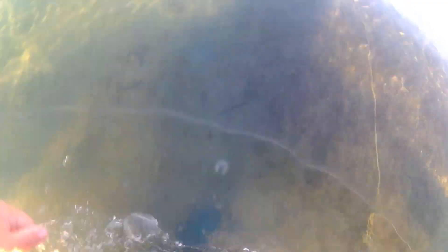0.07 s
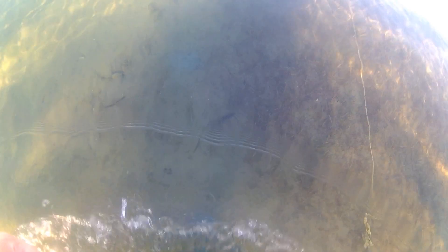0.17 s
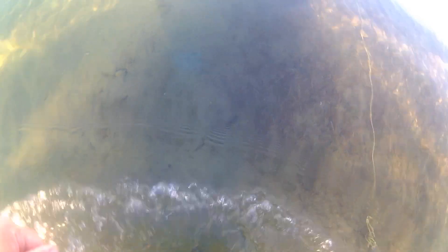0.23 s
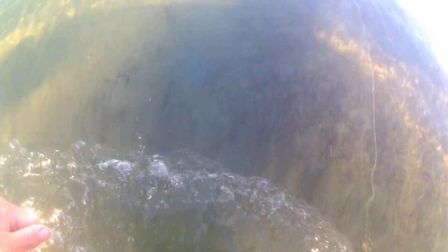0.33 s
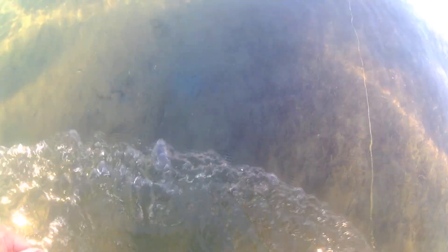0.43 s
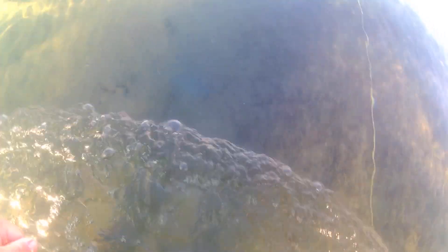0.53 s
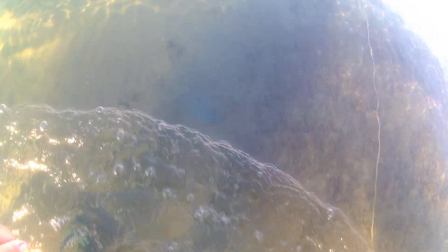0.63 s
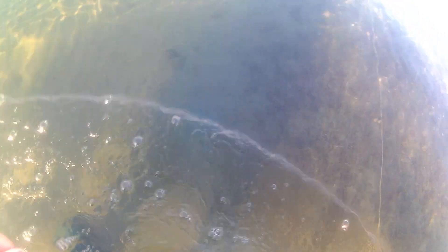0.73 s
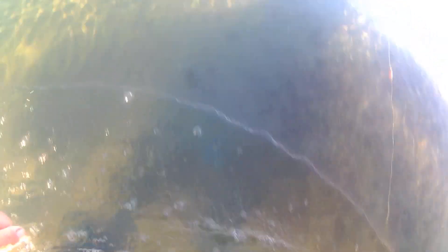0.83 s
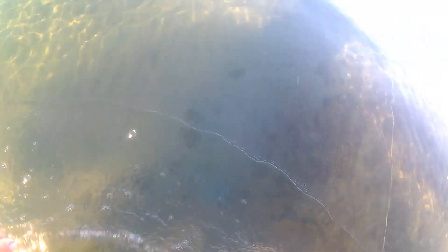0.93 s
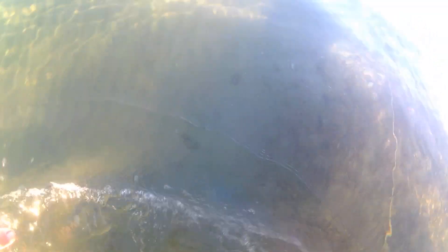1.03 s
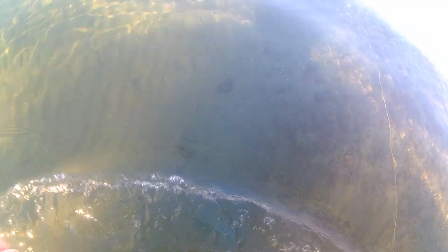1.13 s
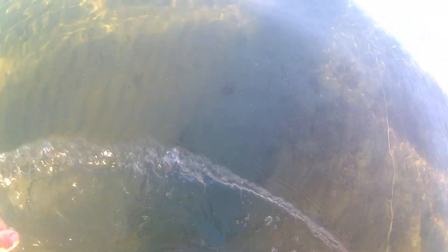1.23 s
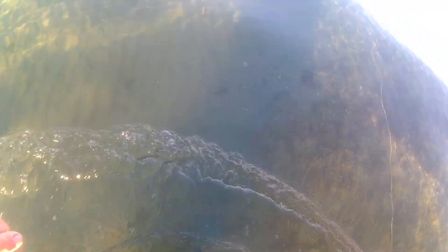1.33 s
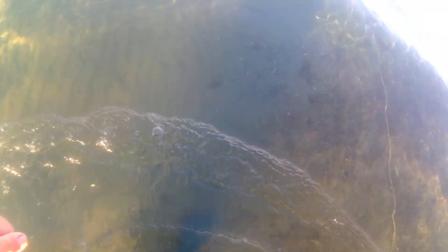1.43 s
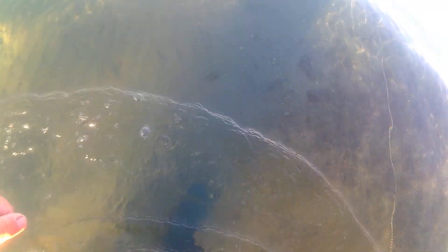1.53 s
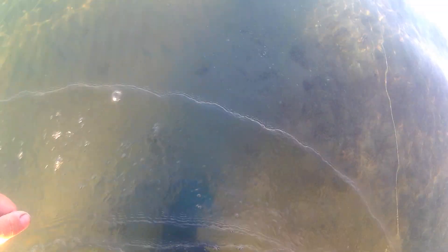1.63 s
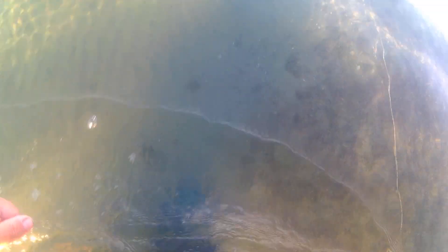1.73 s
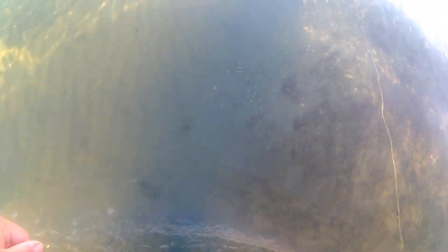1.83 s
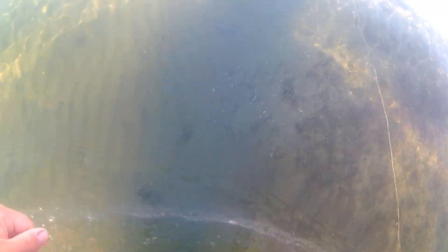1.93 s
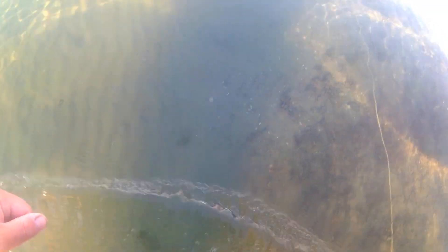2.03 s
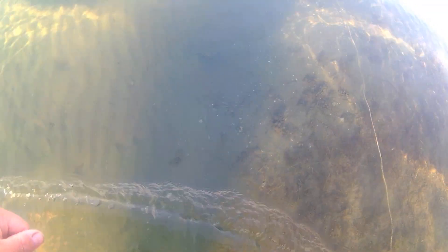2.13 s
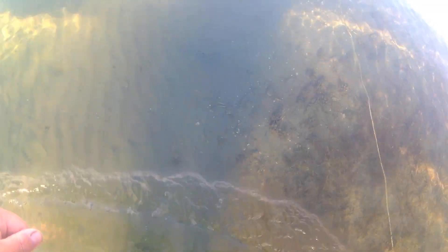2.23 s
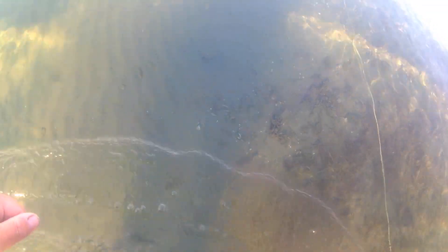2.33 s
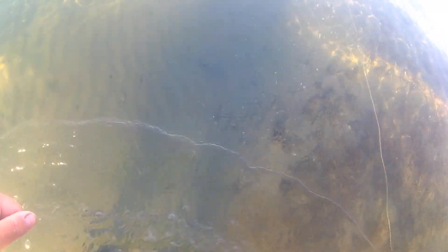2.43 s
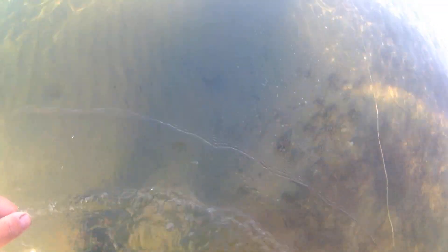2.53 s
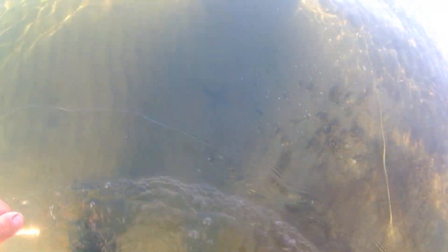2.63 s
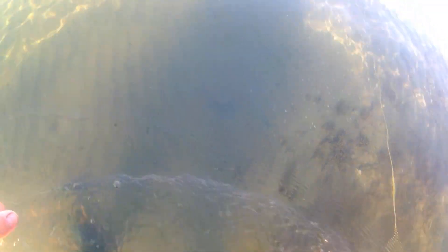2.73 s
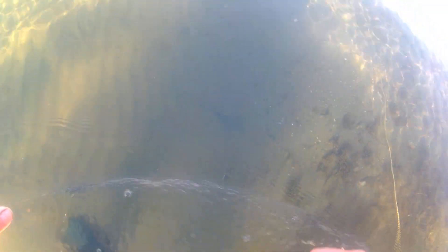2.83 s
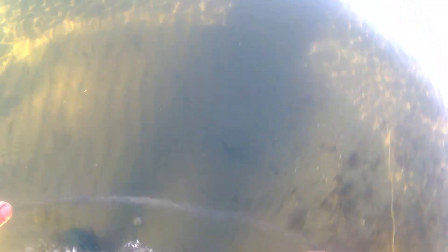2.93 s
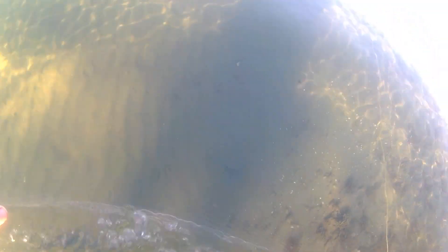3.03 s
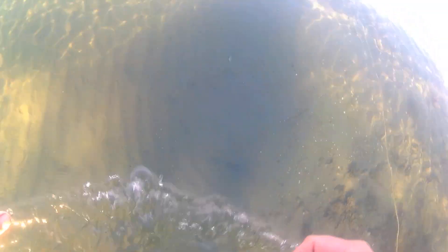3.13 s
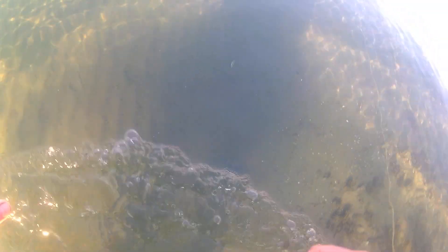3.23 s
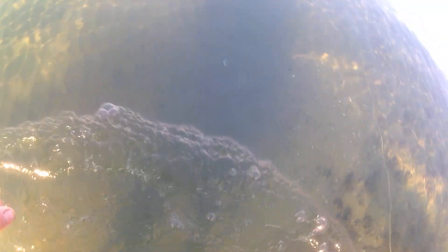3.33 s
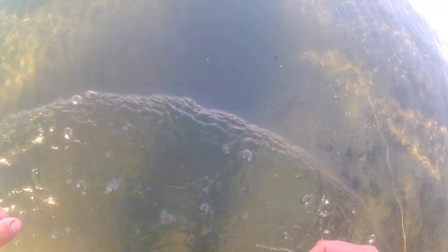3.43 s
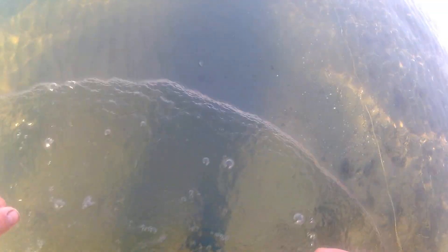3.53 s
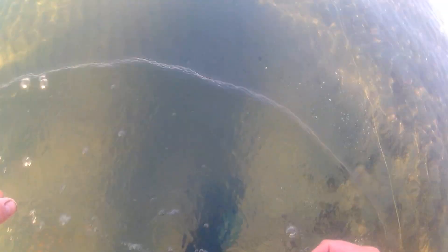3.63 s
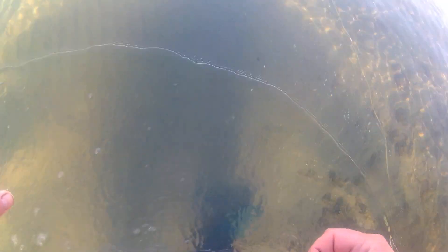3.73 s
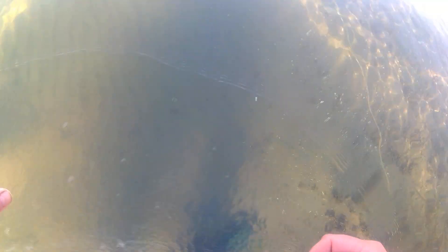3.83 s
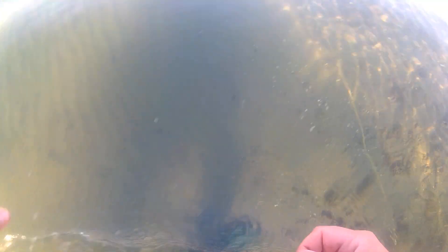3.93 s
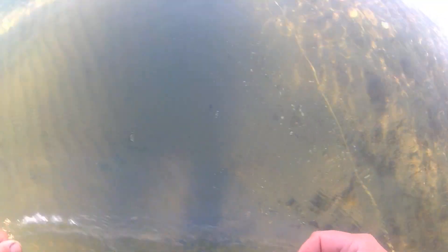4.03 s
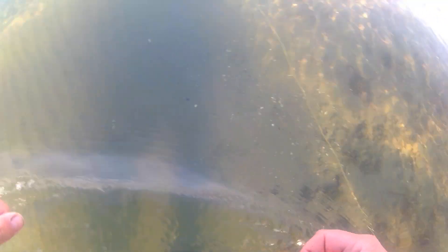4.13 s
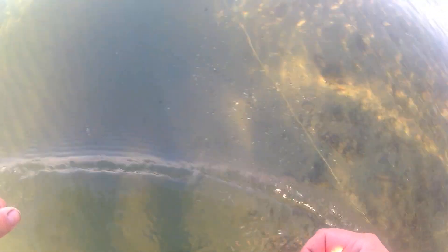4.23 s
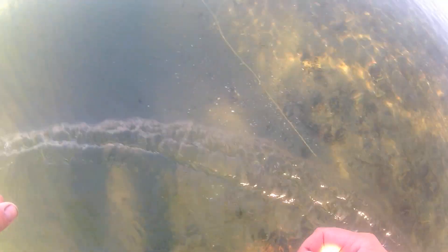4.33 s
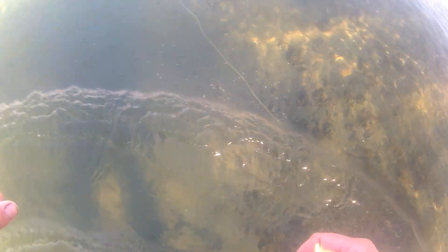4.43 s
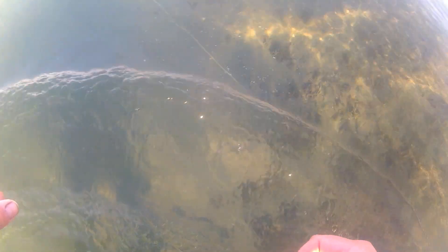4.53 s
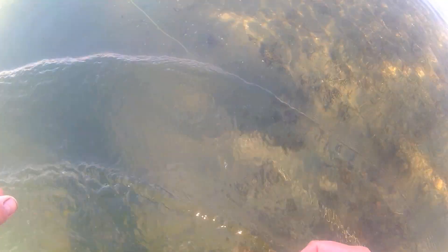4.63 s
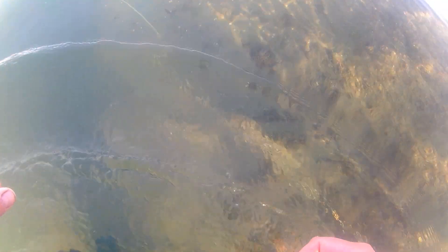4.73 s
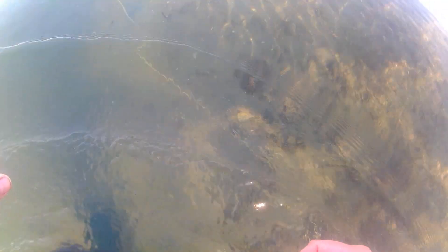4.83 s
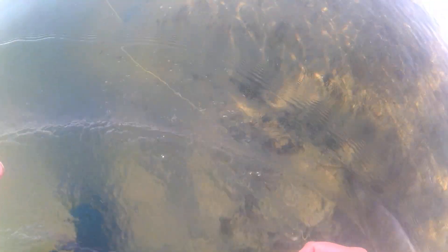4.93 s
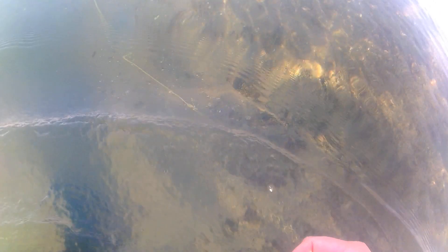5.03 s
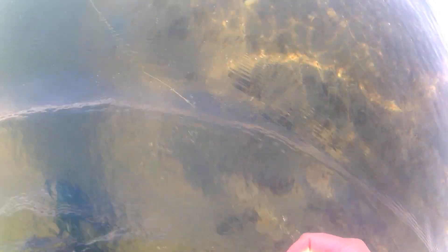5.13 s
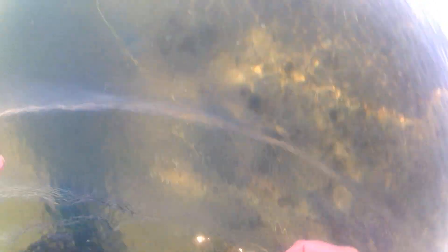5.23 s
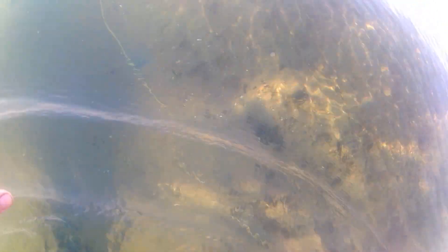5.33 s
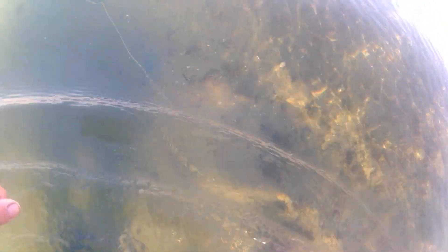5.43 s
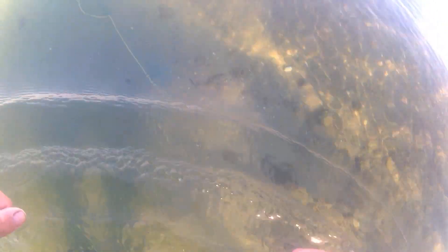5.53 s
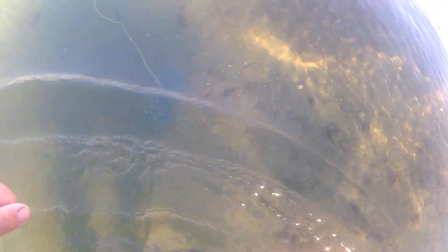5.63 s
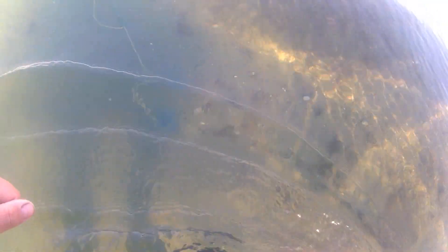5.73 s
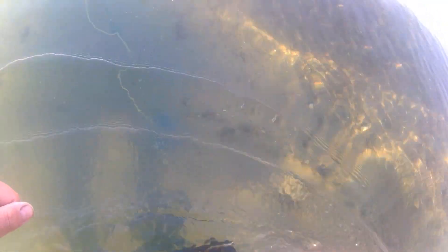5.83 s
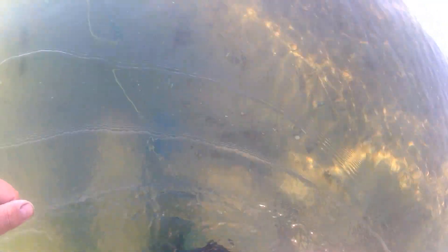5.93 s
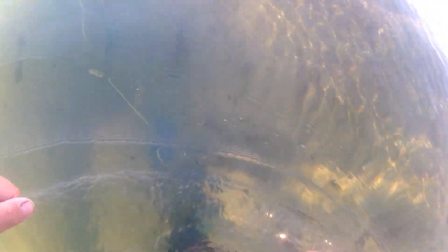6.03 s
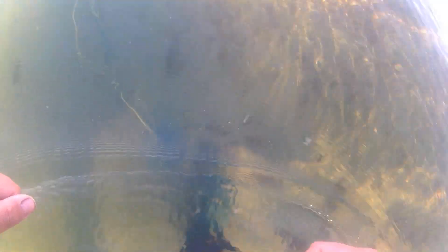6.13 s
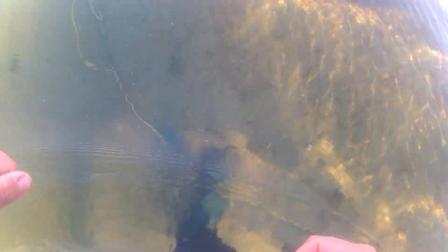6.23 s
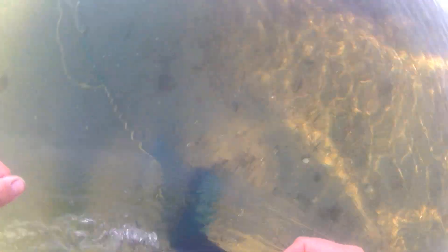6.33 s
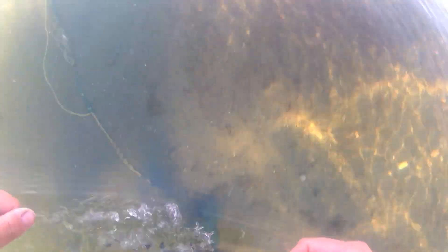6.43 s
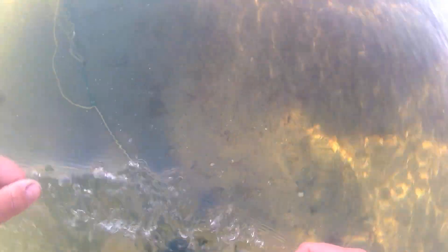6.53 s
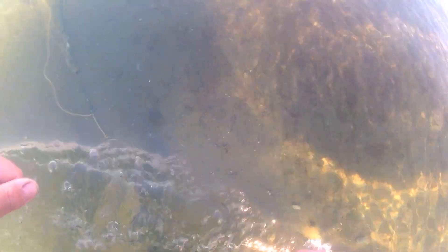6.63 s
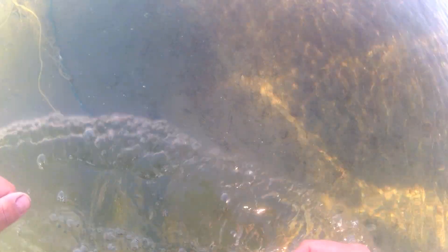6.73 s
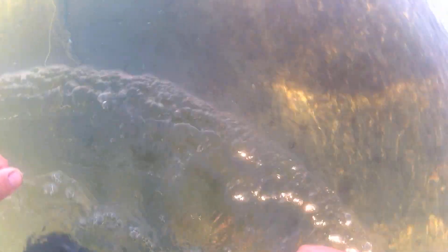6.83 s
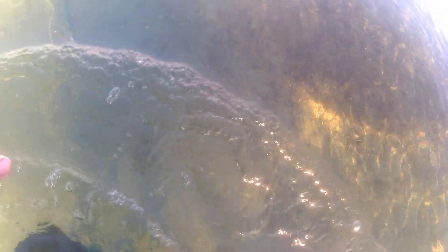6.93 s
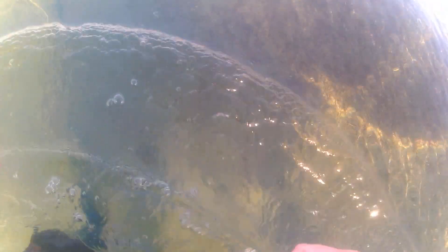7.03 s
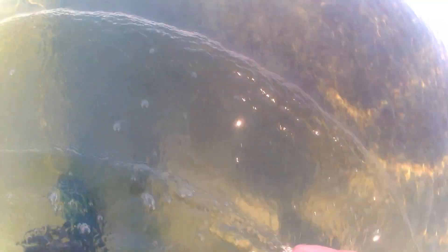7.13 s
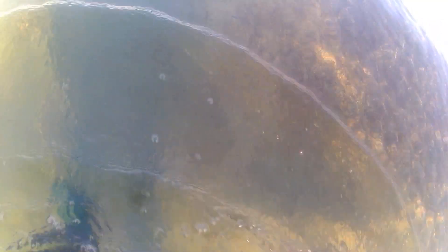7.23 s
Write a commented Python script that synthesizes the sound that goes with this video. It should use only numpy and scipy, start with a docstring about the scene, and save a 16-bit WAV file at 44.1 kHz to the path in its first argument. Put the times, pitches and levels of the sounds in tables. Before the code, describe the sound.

Small sea waves slap a waterproof camera case, heard from the microphone sealed inside: close, dry, boxy and muffled. It opens with a rapid cluster of loud wet knocks and a trickling rush in the first 0.1 second, with a low thud, then falls quiet. Another group clacks at 0.7 to 0.83, with softer taps around 1.0 to 1.1. Two sharp clicks follow at 1.66 and 1.78, the second with a low boom. After a light tick at 2.06 it is nearly still until a strong knock at 2.87. Soft taps come at 3.2, then a hard quick cluster at 3.8 to 3.94 with a ringing bubble. Single knocks hit at 4.2, 4.5 and 5.13, with small trickles between; faint droplets patter near 5.9. A loud double slap with a boom lands at 6.25, lighter knocks follow to 6.6, then droplets and quiet rumble and hiss until 7.3.

```python
"""Small sea waves slap a waterproof camera held at the surface.
Each slap excites modes of the housing and a driven, damped air pocket at the microphone, with short noise bursts.
Between slaps water trickles along the case: random ticks and noise, shaped by a fixed spectrum.
Low thuds, ringing bubbles and droplet ticks are decaying sines; beneath lie a dull rumble, hiss and faint whine."""
import sys
import numpy as np
from scipy.fft import rfft, irfft, next_fast_len
from scipy.io import wavfile
from scipy.ndimage import map_coordinates

SR = 44100
rng = np.random.default_rng(int(sys.argv[2]) if len(sys.argv) > 2 else 0)


def store_pcm(level_fs):
    """Save levels as 16-bit WAV."""
    pcm = np.round(np.clip(level_fs, -1, 1) * 32767).astype(np.int16)
    wavfile.write(sys.argv[1], SR, np.atleast_2d(pcm).T)


N = 320593

# Spectrum of sea rumble and hiss: (frequency [Hz], relative density [dB per Hz])
FLOOR_SPECTRUM = [(20, -14.5), (32, -4), (45, -6), (65, -7.5), (100, -7), (160, -8), (230, -10),
                  (500, -15.5), (920, -18.5), (1400, -20.5), (2200, -22.5), (5000, -27), (7500, -29),
                  (9600, -28), (16000, -29.5)]
# Faint tones of the electronics: (frequency [Hz], rms level [dB])
WHINE_TONES = [(60, -72), (9294, -90), (9373, -86.5), (9453, -88.5), (9533, -83)]
# Water running along the case, before random surges: (time [s], level [dB])
FLOW_LEVELS = [(0.0, -39), (0.24, -70.5), (0.6, -67), (0.87, -55.5), (1.07, -70), (1.62, -61),
               (1.82, -69.5), (2.53, -78.5), (2.97, -66.5), (3.6, -73), (4.21, -67.5), (4.33, -58.5),
               (4.72, -67), (5.1, -66), (5.97, -74.5), (6.32, -61.5), (6.82, -68.5), (7.27, -65)]
# Louder sheets of water sliding over the case: (middle [s], length [s], peak level [dB])
WATER_SHEETS = [(0.06, .045, -60), (1.003, 0.097, -62), (1.393, 0.41, -69), (2.825, 0.078, -67),
                (2.893, 0.089, -54), (3.02, 0.055, -66.5), (4.19, 0.15, -57), (4.38, 0.4, -64),
                (4.544, .065, -61), (4.791, 0.065, -54), (5.094, 0.037, -53.5), (5.247, 0.068, -69),
                (5.572, 0.11, -60), (6.14, 0.11, -64), (6.41, 0.038, -55.5)]
# Spectrum of the trickle and of the swirl after a slap: (frequency [Hz], relative density [dB per Hz])
TRICKLE_SPECTRUM = [(280, -26.5), (370, -23.5), (460, -34), (680, -20), (920, -10.5), (1150, -23),
                    (1400, -11), (1670, 1.5), (1830, -6.5), (2100, -27), (2500, -19), (3300, -41.5),
                    (4030, -22), (4500, -34), (12000, -46.5)]
# Water slaps: (time [s], force [dB], contact time [s], air pocket pitch [Hz],
# trapped air over the force [dB], walls over the force [dB])
WATER_SLAPS = [(.007, -39, 0.0043, 1593, 10, 2.5), (.053, -31.5, .0023, 1665, 6, 1.5),
               (0.0669, -41, .0033, 1676, 15, -2), (0.1065, -45, 0.0037, 1832, 9, 2),
               (0.206, -62.5, 0.0078, 1650, -11, 1.5), (.728, -43.5, .0045, 1667, 11, -1.5),
               (0.748, -42, .0031, 1770, 10.5, 2.5), (0.8276, -29.5, .0016, 1780, 9.5, -6),
               (1.024, -50, 0.0036, 1867, 6.5, -7.5), (1.1327, -63.5, 0.0065, 1650, -18, 2),
               (1.6623, -37, 0.0016, 1486, 5, 3), (1.7776, -38, 0.0031, 1537, -2, -1),
               (2.0592, -53, 0.0017, 1815, 13, 3), (2.8653, -34.5, .0022, 1640, 10, -9.5),
               (3.164, -51.5, 0.0049, 1660, 10.5, -1.5), (3.2029, -52, 0.0064, 1575, 6, 6.5),
               (3.796, -50.5, 0.0019, 1820, 11, 3), (3.8374, -49.5, 0.0012, 1734, 17, 6.5),
               (3.8781, -31, .0028, 1610, 10.5, -2.5), (3.935, -36, 0.002, 1800, 13, 9.5),
               (4.1994, -48.5, 0.0018, 1710, 2.5, -12), (4.511, -41, 0.0021, 1647, 6, -2.5),
               (5.1271, -36.5, .0028, 1663, 7, -4), (5.352, -57, 0.0053, 1560, 9, 9),
               (5.447, -49.5, 0.0016, 1640, -3, -4), (5.722, -63.5, 0.0019, 1790, 18, 11.5),
               (6.2403, -47.5, 0.0011, 1840, 9.5, 4.5), (6.2597, -29.5, 0.0021, 1783, 11, -6),
               (6.2846, -33, .0029, 1603, 10.5, 5), (6.439, -53, .0056, 1706, 7.5, 2.5),
               (6.5773, -45.5, 0.0051, 1590, 7, 2.5), (6.5877, -44, 0.00236, 1700, 1.5, -9)]
# Housing modes, before scatter from blow to blow: (frequency [Hz], relative level [dB], t60 [s])
HOUSING_MODES = [(201, 0, 0.05), (222, -8, 0.12), (256.8, -6.5, .25), (539, -15, 0.11), (626, -14.5, 0.29),
                 (793.6, -5, 0.041), (930, 3.5, 0.017), (1049, -11.5, 0.0078), (1327, -7, 0.024),
                 (1611, -5, 0.019), (1640, -1.5, 0.028), (1879, -10, 0.019), (2263, -2, 0.018),
                 (2516, 2, 0.01), (3020, -7.5, 0.016), (3440, -17.5, 0.024), (3962, 6, 0.0091),
                 (4700, -1.5, 0.0052)]
# Mode bands of body, walls, stiff shell and rim: (lower edge [Hz], upper edge [Hz])
PART_BANDS = [(100, 700), (700, 1150), (1150, 2200), (2200, 5500)]
# The narrow band that the walls pass: (frequency [Hz], gain [dB])
WALL_PASSBAND = [(450, -10.5), (650, 0.5), (780, -10), (1050, -4), (1170, -2.5), (1500, -14)]
# The top rim modes stand out at first, then recede; for an ordinary contact: (time [s], gain [dB])
RIM_LIFT_DB = [(.1, 7), (1.8, 5.5), (2.9, -4), (5.1, -6), (6.2, -3)]
# Spectrum of a slap's crack: (frequency [Hz], relative density [dB per Hz])
CRACK_SPECTRUM = [(1500, -29), (2300, 3.5), (2700, 10), (3300, -10), (4000, 1), (5000, -9), (6000, -32)]
# Spectrum of a slap's spray: (frequency [Hz], relative density [dB per Hz])
SPRAY_SPECTRUM = [(4300, -25.5), (5000, 3), (5450, 4), (5850, -5.5), (6250, 3), (6900, -5.5), (7400, -0.5),
                  (8500, -8), (11000, -10.5), (12000, -17.5), (16000, -11.5)]
# Waves that shove the whole camera: (time [s], push level [dB], boom level [dB])
WAVE_THUDS = [(0.105, -44, -39.5), (0.827, -50.5, -49.5), (1.78, -57, -38.5), (6.287, -62.5, -40)]
# Larger trapped bubbles: (time [s], frequency [Hz], level [dB])
TRAPPED_BUBBLES = [(.84, 1384, -61), (3.937, 1360, -47), (6.29, 1330, -56)]
# Droplets falling back on the sea nearby: (start [s], end [s], typical level [dB])
DROPLET_SHOWERS = [(5.851, 6.06, -74.5), (6.555, 6.62, -64.5), (6.901, 7.08, -78)]

TOP_HZ = 16000  # band limit
MODE_SCATTER_DB = 2  # standard deviation of each mode's level from blow to blow
USUAL_CONTACT_S = 0.0032  # an ordinary slap; longer ones are soft and heavy, shorter ones sharp and light
CLING_S = 0.0007  # water presses on the air pocket this much longer than on the case
# Shares of an ordinary slap, relative to its force
KNOCK_DB, CRACK_DB, SPRAY_DB = -9, -10.5, -22.5
# Change of each share, and of the rim lift, for a doubling of the contact time
KNOCK_SLOPE_DB, CRACK_SLOPE_DB, SPRAY_SLOPE_DB, RIM_SLOPE_DB = 9.5, -9.5, -7, -6.5
# The spray's share gains SPRAY_GROWTH dB for each dB of force above the usual
USUAL_FORCE_DB, SPRAY_GROWTH = -37.5, 0.23


def amp(db):
    """Logarithmic level: decibels converted to an amplitude ratio."""
    return 10 ** (np.asarray(db) / 20)


def unit(x):
    """Power normalisation: the root mean square becomes 1."""
    return x / np.sqrt(np.mean(x ** 2) + 1e-20)


def struck(x):
    """Onset normalisation: a blow has rms 1 over its first fiftieth of a second."""
    return x / np.sqrt(np.mean(x[:SR // 50] ** 2) + 1e-20)


def wobble(rate):
    """Band-limited fluctuation: a smooth curve through random knots, rate of them a second."""
    knots = rng.standard_normal(int(N * rate / SR) + 4)
    return map_coordinates(knots, [np.arange(N) * rate / SR])


def coloured(x, points):
    """Minimum-phase filtering: a folded cepstrum makes the gain of (Hz, dB) points causal."""
    size = 2 * next_fast_len(len(x))
    hz, db = np.transpose(points)
    bins_hz = np.fft.rfftfreq(size, 1 / SR)
    gain_db = np.interp(np.log(bins_hz + 1), np.log(hz), db)
    cepstrum = irfft(np.log(amp(gain_db)), size)
    cepstrum[1:size // 2] *= 2
    cepstrum[size // 2 + 1:] = 0
    response = np.exp(rfft(cepstrum))
    return irfft(rfft(x, size) * response, size)[:len(x)]


def fade(t, t60):
    """Exponential damping: the level falls 60 dB in t60 seconds."""
    return np.exp(-np.log(1000) * np.maximum(t, 0) / t60)


def add(track, s, sound):
    """Superposition: a sound is summed into the track at time s."""
    part = track[max(round(s * SR), 0):][:len(sound)]
    part += sound[:len(part)]


def tone(t, hz, attack, t60):
    """Damped oscillation: one sine with a soft start and an exponential decay."""
    return struck(np.sin(2 * np.pi * hz * t) * (1 - np.exp(-t / attack)) * fade(t, t60))


def floor(level_db=-62):
    """Stationary coloured noise for rumble and hiss, plus tones whose phase wanders at random."""
    t = np.arange(N) / SR
    noise = amp(level_db) * unit(coloured(rng.standard_normal(N), FLOOR_SPECTRUM))
    tones = np.zeros(N)
    for hz, db in WHINE_TONES:
        phase = 1.4 * wobble(11.0)  # radians
        tones += amp(db) * unit(np.sin(2 * np.pi * hz * t + phase))
    return noise + tones


def trickle(rate=220, spread_db=3, smooth_db=-4, surge_db=2.5):
    """Shot noise: random bubble ticks (rate a second) and smooth noise are coloured and follow the flow."""
    s, db = np.transpose(FLOW_LEVELS)
    flow_db = np.interp(np.arange(N) / SR, s, db)
    flow = amp(flow_db + surge_db * wobble(22))
    for middle, length, sheet_db in WATER_SHEETS:
        swell = np.hanning(int(abs(length) * SR))
        add(flow, middle - length / 2, amp(sheet_db) * swell)
    happens = rng.random(N) < rate / SR
    sizes = amp(spread_db * rng.standard_normal(N))
    ticks = happens * rng.choice([-1, 1], N) * sizes
    drive = unit(ticks) + amp(smooth_db) * rng.standard_normal(N)
    return flow * unit(coloured(drive, TRICKLE_SPECTRUM))


def ring(t, band, attack, tilt_db=0, detune=0.012):
    """Modal superposition: one band's modes, varied for each blow and tilted by tilt_db an octave."""
    chosen = [mode for mode in HOUSING_MODES if band[0] <= mode[0] < band[1]]
    hz, db, t60 = np.transpose(chosen)[:, :, None]
    strength, shift = rng.standard_normal((2, len(hz), 1))
    sign = (-1) ** np.arange(len(hz))[:, None]  # neighbouring modes swing against each other
    gain = sign * amp(db + MODE_SCATTER_DB * strength + tilt_db * np.log2(hz / band[0]))
    modes = gain * fade(t, t60) * np.sin(2 * np.pi * hz * (1 + detune * shift) * t)
    return struck(modes.sum(0) * (1 - np.exp(-t / attack)))


def pocket(t, hz, contact, attack=0.0023, t60=0.0105):
    """Driven resonance: trapped air sounds while water presses on it, then decays freely."""
    return struck(np.sin(2 * np.pi * hz * t) * (1 - np.exp(-t / attack)) * fade(t - contact, t60))


def burst(t, spectrum, t60):
    """Transient noise: a decaying random signal is coloured by a spectrum."""
    return struck(coloured(rng.standard_normal(len(t)) * fade(t, t60), spectrum))


def slaps(shell_db=-5, grit_db=-4, swirl_db=-33, hardness_tilt=1.8, usual_db=6):
    """Impact excitation: a long contact favours the low body knock, a short one the crack and spray."""
    out, t = np.zeros(N), np.arange(SR // 3) / SR
    body, walls, shell, rim = PART_BANDS
    for s, force_db, contact, hz, air_db, wall_db in WATER_SLAPS:
        softness = np.log2(contact / USUAL_CONTACT_S)  # doublings of the usual contact time
        knock_db = KNOCK_DB + KNOCK_SLOPE_DB * softness
        crack_db = CRACK_DB + CRACK_SLOPE_DB * softness
        extra_force_db = force_db - USUAL_FORCE_DB
        spray_db = SPRAY_DB + SPRAY_SLOPE_DB * softness + SPRAY_GROWTH * extra_force_db
        bright_db = np.interp(s, *np.transpose(RIM_LIFT_DB)) + RIM_SLOPE_DB * softness

        knock = ring(t, body, attack=0.0014)

        hardness_db = wall_db - knock_db - usual_db  # light, hard slaps favour the higher wall modes
        wall_modes = ring(t, walls, attack=0.0039, tilt_db=hardness_tilt * hardness_db)
        wall = struck(coloured(wall_modes, WALL_PASSBAND))

        shell_ring = amp(shell_db) * ring(t, shell, attack=0.00035)
        air = struck(pocket(t, hz, contact + CLING_S) + shell_ring)
        swirl = amp(swirl_db) * burst(t, TRICKLE_SPECTRUM, t60=0.44)

        grit = amp(grit_db) * burst(t, CRACK_SPECTRUM, t60=0.016)
        crack = ring(t, rim, attack=0.0012) + grit
        rim_gain = [(2900, 0.015), (3800, bright_db), (4300, bright_db), (5500, 0)]  # (Hz, dB)
        crack = struck(coloured(crack, rim_gain))
        spray = burst(t, SPRAY_SPECTRUM, t60=0.012)

        slap = (amp(knock_db) * knock + amp(wall_db) * wall + amp(air_db) * (air + swirl)
                + amp(crack_db) * crack + amp(spray_db) * spray)
        add(out, s, amp(force_db) * slap)
    return out


def thuds():
    """Low-frequency impulse response: a heavy wave gives a strongly damped push and a longer case boom."""
    out, t = np.zeros(N), np.arange(SR // 4) / SR
    for s, push_db, boom_db in WAVE_THUDS:
        push = tone(t, hz=97, attack=0.00063, t60=0.019)
        boom = tone(t, hz=197.5, attack=0.0011, t60=0.12)
        add(out, s, amp(push_db) * push + amp(boom_db) * boom)
    return out


def bubbles():
    """Bubble resonance: trapped air in water rings as a damped sine."""
    out, t = np.zeros(N), np.arange(SR // 3) / SR
    for s, hz, db in TRAPPED_BUBBLES:
        add(out, s, amp(db) * tone(t, hz, attack=0.004, t60=0.21))
    return out


def patter(rate=45, hz=3100, spread=0.2, size_db=2, t60=0.008):
    """Random point process: droplets tick after log-normal gaps, with median gap 1 / rate seconds."""
    out, t = np.zeros(N), np.arange(SR // 20) / SR
    for start, end, db in DROPLET_SHOWERS:
        gaps, pitches, sizes = rng.standard_normal((16, 3)).T  # at most 16 droplets a shower
        times = start + np.cumsum(np.exp(0.5 * gaps)) / rate
        for s, pitch, size in zip(times[times < end], pitches, sizes):
            tick = tone(t, hz * np.exp(spread * pitch), attack=0.00084, t60=t60)
            add(out, s, amp(db + size_db * size) * tick)
    return out


def scene():
    """Linear superposition: all sources sum at one microphone inside the housing."""
    return (floor() + trickle() + slaps() + thuds() + bubbles() + patter())[None]


def record(dry):
    """Ideal low-pass filtering: nothing remains at or above the band limit."""
    size = next_fast_len(N + SR)
    passed = np.fft.rfftfreq(size, 1 / SR) < TOP_HZ
    return irfft(rfft(dry, size) * passed, size)[:, :N]


dry = scene()
out = record(dry)
store_pcm(out)
```